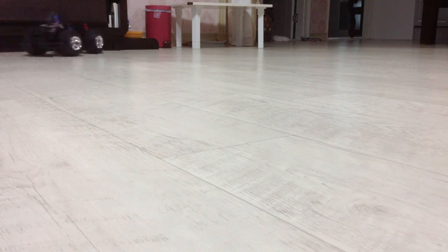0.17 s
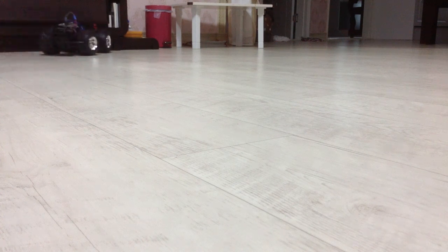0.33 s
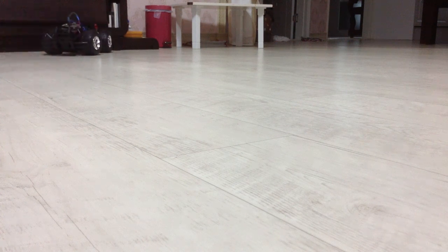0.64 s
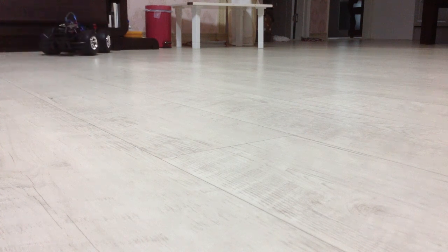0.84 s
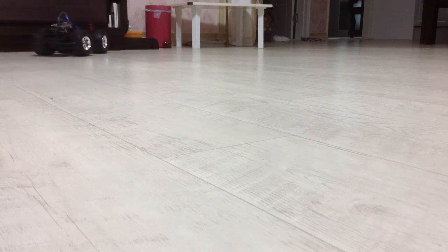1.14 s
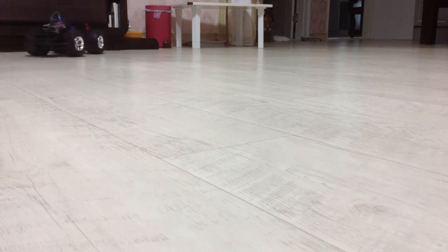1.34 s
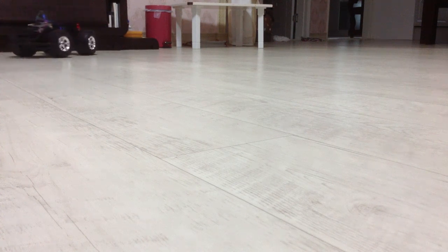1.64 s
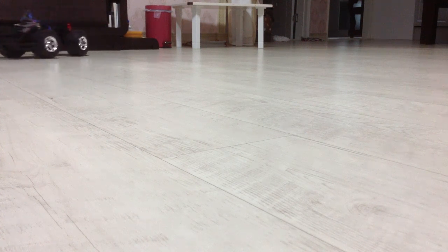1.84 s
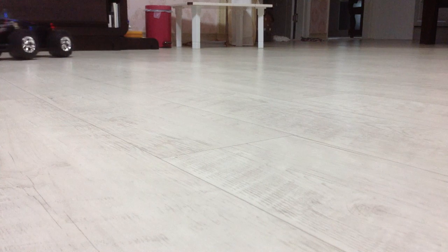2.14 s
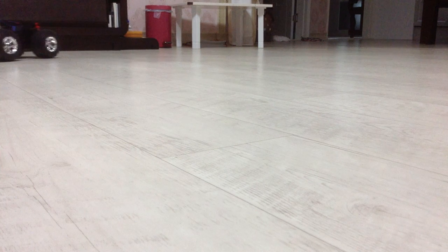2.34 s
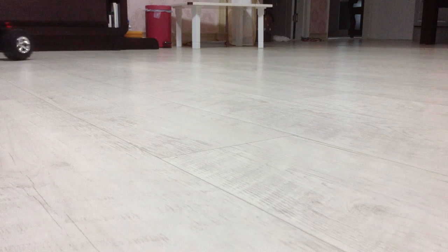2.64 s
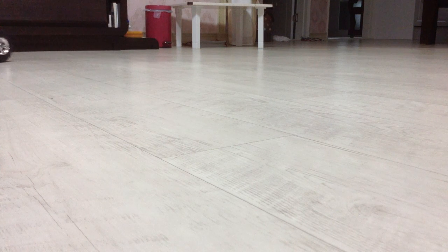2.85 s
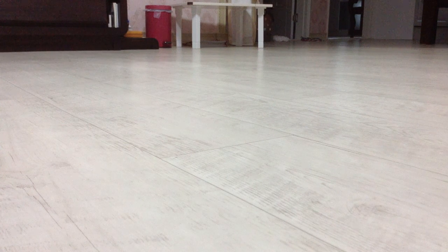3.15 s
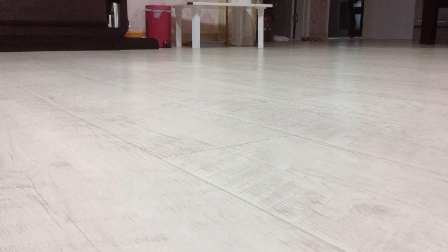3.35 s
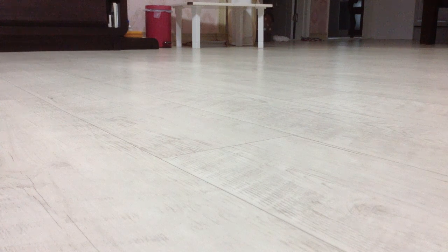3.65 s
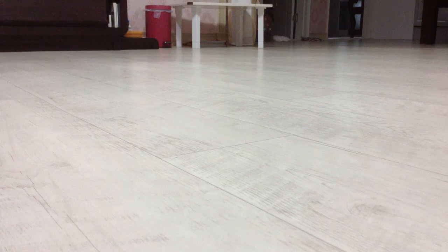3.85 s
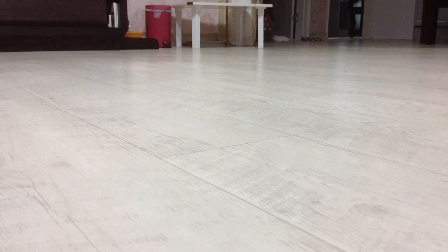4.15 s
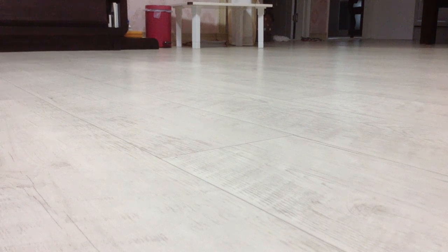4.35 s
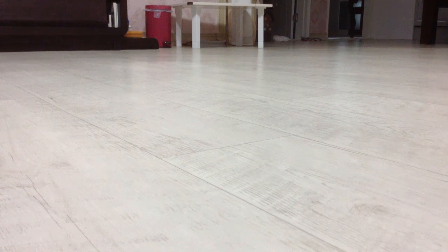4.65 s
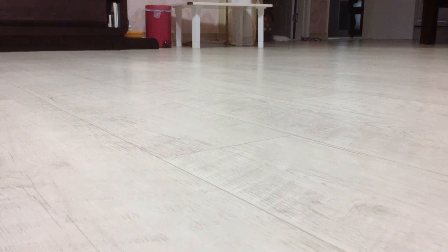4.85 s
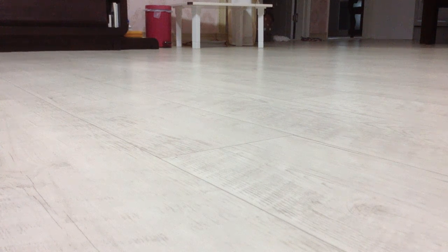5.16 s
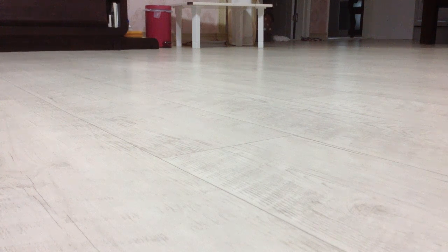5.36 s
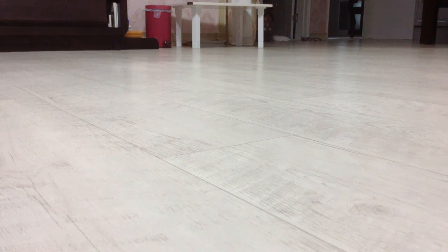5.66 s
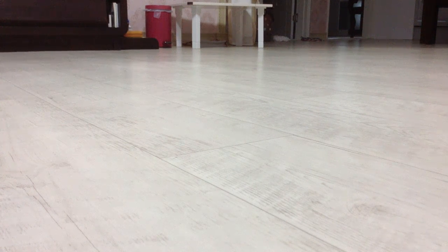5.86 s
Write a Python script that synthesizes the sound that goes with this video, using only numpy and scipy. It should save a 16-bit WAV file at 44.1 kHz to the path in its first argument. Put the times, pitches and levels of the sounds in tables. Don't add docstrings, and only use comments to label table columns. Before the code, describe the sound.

Already at speed, a toy car's rough plastic rattle and motor hiss fill a bare room, then a hard clattering crash rings out almost at once. A few small rebounds follow, then near quiet. The car starts again softly, jerking and bumping over floor joints, grows into a loud steady chatter, and stops with a bright lighter knock. A weak ticking restart begins to build. The microphone sits near the floor, over faint hum.

```python
import sys
import numpy as np
from scipy import signal
from scipy.fft import rfft, irfft
from scipy.io import wavfile
from scipy.ndimage import uniform_filter1d

SR = 44100
rng = np.random.default_rng(int(sys.argv[2]) if len(sys.argv) > 2 else 0)


def makeup_ratio(level_db):
    decades = np.asarray(level_db, float) / 20
    return 10 ** decades


def digitize_waveform(pressure):
    field = np.atleast_2d(pressure).T
    bounded = np.clip(field, -1, 1)
    quanta = np.round(bounded * 32767).astype(np.int16)
    wavfile.write(sys.argv[1], SR, quanta)


N = 265041

# [f/Hz, width/Hz, level/dB]
SHELL = [(1155, 130, 2.5), (1356, 95, 4.5), (1425, 370, 0)]
# [f/Hz, t60/s]
ROOM_T60 = [(150, 0.31), (500, 0.6), (1500, 0.6), (4000, 0.4), (7000, 0.56), (10500, 0.44), (14000, 0.47)]


def rms_one(x):
    return x / np.sqrt(np.mean(x ** 2) + 1e-20)


def at_hz(points, hz):
    points = np.array(points)
    return np.interp(np.log(hz), np.log(points[:, 0]), points[:, 1])


def in_time(rows, stop_s):
    s, *columns = np.transpose(rows)
    t = np.arange(N) / SR
    gate = np.interp(t, [s[0] - stop_s, s[0], s[-1], s[-1] + stop_s], [0, 1, 1, 0])
    return gate, [np.interp(t, s, c) for c in columns]


def drift(rate_hz):
    r = np.exp(-2 * np.pi * rate_hz / SR)
    noise = rng.standard_normal(N + SR)
    return rms_one(signal.lfilter([1], [1, -2 * r, r * r], noise)[SR:])


def band_pass(order, low_hz, high_hz):
    return signal.butter(order, [low_hz, high_hz], "band", fs=SR, output="sos")


def resonate(x, peaks):
    out = 0
    for k, (hz, width_hz, level_db) in enumerate(peaks):
        r = np.exp(-np.pi * width_hz / SR)
        b = (1 - r * r) / 2 * np.array([1, 0, -1])
        a = [1, -2 * r * np.cos(2 * np.pi * hz / SR), r * r]
        out = out + (-1) ** k * makeup_ratio(level_db) * signal.lfilter(b, a, x)
    return out


def ring(clicks, hz, t60_s):
    r, w = makeup_ratio(-60 / (t60_s * SR)), 2 * np.pi * hz / SR
    return signal.lfilter([0, np.sin(w)], [1, -2 * r * np.cos(w), r * r], clicks)


def tail(build_s):
    t, edges_hz, out = np.arange(SR // 2) / SR, 90 * 2 ** np.arange(0, 9.0), 0
    for low, high in zip(edges_hz, edges_hz[1:]):
        band = band_pass(2, low, min(high, 0.45 * SR))
        fade = makeup_ratio(-60 * t / at_hz(ROOM_T60, np.sqrt(low * high)))
        out = out + fade * signal.sosfilt(band, rng.standard_normal(len(t)))
    out = out * (1 - np.exp(-t / build_s))
    return out / np.sqrt(np.sum(out ** 2))


def room(x, wet_db, build_s, count):
    place, wet = np.arange(N) / N * (count - 1), 0
    for k in range(count):
        share = np.cos(np.pi / 2 * np.clip(place - k, -1, 1))
        wet = wet + signal.fftconvolve(x * share, tail(build_s))[:N]
    return x + makeup_ratio(wet_db) * wet


def scatter(x, wet_db, build_s):
    wet, white, edges_hz = 0, rng.standard_normal((2, N)), 340 * 2 ** np.arange(0, 6, 0.5)
    rise = np.exp(-1 / (build_s * SR))
    for k, (low, high) in enumerate(zip(edges_hz, edges_hz[1:])):
        band = band_pass(2, low, high)
        fall = makeup_ratio(-120 / (SR * at_hz(ROOM_T60, np.sqrt(low * high))))
        energy = signal.sosfilt(band, x + 1e-12 * white[0]) ** 2
        poles = np.convolve([1, -fall], [1, -rise])
        power = signal.lfilter([(1 - fall) * (1 - rise)], poles, energy)
        wet = wet + np.sqrt(np.abs(power)) * rms_one(signal.sosfilt(band, white[k % 2]))
    return x + makeup_ratio(wet_db) * wet


def contacts(per_s, spread_db, lumpy_db):
    heights = makeup_ratio(spread_db * np.minimum(rng.exponential(1, N), 4.0))
    sizes = heights * rng.choice([-1, 1], N)
    born = rng.random(N) < per_s * makeup_ratio(lumpy_db * drift(25.0)) / SR
    return rms_one(sizes * born / np.sqrt(per_s))


def household_hum():
    # [f/Hz, density/dB]
    spectrum = [(24, -64), (62, -53), (78, -18.5), (110, -23), (165, -4.5), (271, -3.5), (320, -8),
                (586, -11.5), (751, -11), (1010, -17), (1930, -24), (3000, -26), (3450, -23.5), (6060, -20),
                (9500, -28.5), (15200, -35)]
    hz = np.fft.rfftfreq(N, 1 / SR) + 1
    noise = irfft(rfft(rng.standard_normal(N)) * makeup_ratio(at_hz(spectrum, hz)), N)
    return makeup_ratio(-56.5 + 0.5 * drift(0.9)) * rms_one(noise)


def knocks():
    # [t/s, ring f/Hz, ring level/dB, rattle level/dB, brightness/dB]
    hard = [(.3078, 710, -28, -25.5, -11), (0.3121, 744, -23.5, -24, 1), (0.3134, 1940, -20, -20.5, 2.5),
            (0.3152, 1210, -21.5, -25.5, 5), (0.316, 3420, -18, -42, 4), (0.3194, 570, -24, -46, -18),
            (0.3235, 1505, -21, -36, -10), (0.327, 1377, -16.5, -30, -9), (0.3272, 774, -23.5, -47, -5),
            (0.338, 678, -27, -49, -5), (0.334, 3300, -39, -50, -14), (0.342, 2300, -21.5, -27, -23),
            (0.3804, 1224, -24, -51, -1), (0.33, 403, -34, -52, -10), (0.422, 570, -32.5, -50, -6)]
    rebounds = [(0.606, 1300, -43, -45, 0), (0.6107, 2050, -40, -44, -10), (0.612, 7100, -45, -48, -6),
                (0.6125, 2030, -36, -40, -10), (0.628, 1400, -41, -41, -10), (0.666, 1510, -43, -47, -4),
                (0.677, 790, -42, -47, -9), (.680, 806, -34, -35, -15), (0.683, 1310, -37, -35, -12),
                (0.692, 3580, -41, -44, -9), (0.701, 2050, -31, -49, 0.5), (0.707, 8350, -35, -49, 2),
                (0.708, 7100, -39, -50, 1), (0.7026, 1680, -31, -38, -7), (0.713, 2300, -36, -46, -5),
                (0.7093, 1490, -31.5, -39, -8), (.708, 664, -33.5, -37.5, -8), (0.712, 538, -37, -50, -10),
                (0.732, 2270, -34, -37, -11), (0.745, 610, -37.5, -50, -7), (0.77, 1245, -37, -53, -7),
                (0.814, 744, -42, -52, -9), (0.889, 2200, -46, -44, -6), (4.3455, 2300, -37, -50, 2),
                (4.348, 2280, -30, -48, 5), (4.3512, 1400, -40, -46, -12),
                (4.3515, 4460, -24.5, -38.5, 1.5), (4.3515, 1300, -31, -50, 7), (4.3525, 6100, -30, -54, 7),
                (4.387, 8600, -40, -58, 6), (4.361, 1280, -37, -50, 0), (4.368, 4400, -35, -58, 9),
                (4.412, 1050, -40, -52, 7)]
    ticks = [(1.031, 1500, -45, -56, -9), (1.032, 700, -48, -60, -9), (1.072, 800, -48, -60, -9),
             (4.6, 9000, -56, -66, 6), (1.4325, 1900, -47, -52, -3), (1.9244, 1580, -48, -52, -3),
             (4.605, 2400, -60, -63, 0), (4.832, 2600, -60, -61, -1), (5.103, 2500, -54, -57, -1),
             (5.1675, 2100, -54, -55, 2), (5.385, 2600, -52, -56, -2), (5.549, 2300, -53, -56, 1),
             (5.562, 1900, -53, -57, 0), (5.6766, 2600, -51, -54, -2)]
    # [f/Hz, level/dB, t60/s]
    floor_modes = [(176, -23.5, 0.26), (213, -13, 0.18), (328, -16, 0.069)]
    edges_hz = [480, 1750, 5000, 9500]
    # [f/Hz, width/Hz, level/dB]
    metal = [(7050, 800, -4), (5500, 1400, -11)]
    rattle_s, ring_t60_s, ring_wet = 0.014, 0.043, makeup_ratio(-11)
    tick_db, tick_follows = -6, 1.77

    rows, rings, rattles = np.array(hard + rebounds + ticks), np.zeros(N), np.zeros(N)
    at = np.round(rows[:, 0] * SR).astype(int)
    loose = rng.choice([-1, 1], (3, N)) * (rng.random((3, N)) < 0.3)
    clack_db, bright_db = rows[:, 3], rows[:, 4]
    levels_db = [clack_db, clack_db + bright_db, clack_db + tick_db + tick_follows * bright_db]
    for group, level_db in enumerate(levels_db):
        blows = np.full(N, 1e-18)
        blows[at] = makeup_ratio(level_db + 14)
        fading = signal.lfilter([1], [1, -np.exp(-1 / (rattle_s * SR))], blows)
        burst = (-1) ** group * 0.89 * blows + 0.18 * fading * loose[group]
        order = 1 if group == 2 else 2
        rattles += signal.sosfilt(band_pass(order, *edges_hz[group:group + 2]), burst)

    click = signal.unit_impulse(SR // 4)
    for i, (_, hz, ring_db, *_) in zip(at, rows):
        t60_s = ring_t60_s * (1000 / hz) ** 0.97
        rings[i:i + SR // 4] += makeup_ratio(ring_db) * ring(click, hz, t60_s)
    floor_blows = np.full(N, 1e-18)
    floor_blows[at] = makeup_ratio(2 * clack_db + 15.5)
    thud = sum(makeup_ratio(level_db) * ring(floor_blows, hz, t60_s) for hz, level_db, t60_s in floor_modes)

    near = rings * (1 - ring_wet)
    heard = near + room(ring_wet * rings + thud, wet_db=3.5, build_s=0.0003, count=3)
    crash = scatter(rattles, wet_db=4.0, build_s=0.0012)
    dull = signal.sosfilt(signal.butter(1, 14500.0, fs=SR, output="sos"), 1.075 * crash)
    heard = heard + dull + resonate(crash, metal)
    return signal.sosfilt(signal.butter(4, 140.0, "high", fs=SR, output="sos"), heard)


def bumps():
    # [t/s, peak/dB, ring f/Hz]
    thumps = [(1.031, -36, 1150), (1.065, -42, 1495), (1.073, -36, 1194), (1.2503, -34, 1200),
              (1.3922, -36, 1315), (1.4347, -35, 1290), (1.528, -41.5, 1570), (1.671, -33, 1480),
              (1.6844, -29, 1214), (1.717, -35, 1455), (1.73, -32, 1234), (1.761, -49, 1200),
              (1.798, -36, 1400), (1.847, -39, 1215), (1.895, -29, 1366), (1.921, -31, 1196),
              (1.947, -31, 1434), (1.9972, -33, 1400), (2.011, -42, 1150), (2.0561, -32, 2190),
              (2.07, -29, 1350), (2.0894, -47, 1350), (2.12, -36, 1300), (2.169, -50, 1340),
              (2.27, -47, 1450), (2.321, -38, 1470), (2.4048, -33, 1840), (2.47, -32, 1210),
              (2.476, -30, 1393), (2.546, -34, 1378), (2.65, -37, 1500), (2.79, -30.5, 1290),
              (2.971, -26.5, 1364), (4.605, -54, 1700), (4.832, -52, 1800), (5.055, -53, 1450),
              (5.1043, -50, 1700), (5.385, -44, 1100), (5.8, -44, 1350), (5.937, -46, 1300),
              (5.1675, -53, 1310), (5.5534, -56, 1300), (5.6767, -46, 1580)]
    rise_s, t60_s, ring_level_db = 0.003, 0.038, -8
    clicks, rings = np.full(N, 1e-18), np.zeros(N + SR)
    rise = 1.58 * (1 - np.exp(-np.arange(SR // 4) / SR / rise_s))
    click = signal.unit_impulse(SR // 4)
    for s, peak_db, hz in thumps:
        i = round(s * SR)
        clicks[i] = makeup_ratio(peak_db + 20.0)
        rings[i:i + SR // 4] += makeup_ratio(peak_db + ring_level_db) * rise * ring(click, hz, t60_s)
    struck = resonate(resonate(clicks, SHELL), [(1400, 280, 0)])
    panels = resonate(resonate(rings[:N], [(1350, 780, 1)]), [(1350, 1100, 0)])
    return struck + panels


def whine():
    # [t/s, f/Hz, level/dB]
    course = [(1.85, 1370, -60), (2.1, 1370, -61), (2.2, 1333, -60), (2.33, 1370, -56), (2.45, 1350, -51),
              (2.56, 1378, -53), (2.65, 1342, -54), (2.78, 1317, -53), (2.9, 1350, -49), (2.99, 1350, -57),
              (3.08, 1296, -54), (3.2, 1350, -51), (3.3, 1350, -52)]
    blur_per_s, trim_db = 12.0, -4
    gate, (hz, level_db) = in_time(course, stop_s=0.08)
    phase = 2 * np.pi * np.cumsum(hz) / SR
    steady, loose = 0.78 + 0.48 * drift(blur_per_s), 0.42 * drift(blur_per_s)
    return gate * makeup_ratio(level_db + trim_db) * (steady * np.sin(phase) + loose * np.cos(phase))


def gear_tones():
    # [peak t/s, f/Hz, peak/dB, length/s, glide/(Hz/s)]
    tones = [(0.13, 905, -41.5, 0.11, -55), (0.18, 945, -40.5, 0.07, 48), (0.085, 955, -50, .05, 48),
             (0.215, 865, -45, 0.0505, -40), (0.027, 620, -52, .1, 40), (0.03, 1345, -49, .04, 30),
             (0.031, 1610, -49, 0.06, -50), (0.005, 1400, -47, 0.044, -50), (0.245, 1440, -49, .07, 40),
             (0.15, 1540, -48.5, 0.19, 50), (0.25, 1460, -55, .1, 27), (0.27, 590, -48, 0.17, 16),
             (0.045, 2900, -53.5, 0.16, -50), (0.085, 2790, -53, 0.075, 50), (0.15, 3540, -57, 0.14, 50),
             (0.205, 2920, -47.5, 0.073, 47), (0.26, 2500, -54, 0.092, 52), (0.2, 6010, -62, .15, 50),
             (2.37, 655, -59, 0.36, 29), (2.755, 735, -48.5, 0.043, 19.5), (3.12, 990, -56.5, 0.24, 20),
             (3.17, 810, -68, .12, 200), (1.98, 1370, -62, 0.12, -100), (2.16, 1341, -61, 0.12, -100),
             (2.52, 745, -53, .08, 20), (2.62, 745, -48.5, 0.1396, 60), (2.48, 920, -48, .05, -40),
             (2.3, 1460, -52, .1, 60), (2.885, 755, -44.5, 0.09, 20), (2.88, 1350, -55, .12, 52.5),
             (3.049, 758, -45.5, 0.18, 22), (3.077, 1300, -58, .12, -200), (3.563, 658, -52, 0.095, 6),
             (3.566, 1025, -48.5, 0.16, 35), (3.6, 1190, -49, 0.18, -51), (4.5, 669, -53, 0.27, -28),
             (3.795, 916, -49, 0.22, 5), (4.164, 619, -44.5, .1, 101.5), (4.258, 998, -49, 0.161, 105),
             (4.28, 674, -53, 0.08, -48.5)]
    more_tones = [
        (1.73, 1190, -58, 0.12, -51),
        (1.74, 1420, -56, .07, -40),
        (1.92, 3600, -60, .12, 40),
        (1.9, 2750, -60, .05, 40),
        (1.7, 800, -58, .1, 30),
                  (3.301, 685, -52, .18, 18), (3.238, 1260, -49, .1, -100), (3.33, 1490, -55, .12, 23),
            (3.39, 1500, -55, .12, 17), (3.396, 1280, -54, .08, 20), (3.48, 1485, -55, 0.063, 20),
            (3.803, 620, -56, 0.12, 20), (3.79, 1200, -52, .06, 20), (3.3, 960, -48, 0.1096, 20),
            (3.9, 1175, -53, .15, -46), (3, 2600, -56, .06, 20), (4.04, 595, -49.5, 0.15, -55),
            (4.039, 740, -51, 0.0796, 20), (4.045, 1300, -57, 0.078, 20), (4.13, 907, -50, 0.16, 19),
            (4.198, 1270, -49, .12, -50), (4.226, 3600, -50, 0.073, 20), (3.74, 590, -53, .12, 20),
            (3.72, 980, -53, 0.086, 18), (5.74, 1060, -57.5, 0.15, -31.5), (5.83, 1370, -57, 0.1, 20),
            (5.73, 910, -60, .08, 20), (5.55, 630, -63, .1, 20), (5.19, 1100, -62, .06, 20)]
    fade_db = 14.5
    out = np.zeros(N)
    waver, flicker_db = 1 + 0.005 * drift(12.5), 3.5 * drift(19.0)
    for s, hz, peak_db, length_s, glide in tones + more_tones:
        start, stop = max(int((s - length_s) * SR), 0), min(int((s + length_s) * SR), N)
        span = slice(start, stop)
        since_s = np.arange(start, stop) / SR - s
        phase = 2 * np.pi * np.cumsum((hz + glide * since_s) * waver[span]) / SR
        throb = 1 + 0.3 * np.sin(phase / 22.0)
        swell_db = -fade_db * (2 * since_s / length_s) ** 2
        out[span] += makeup_ratio(peak_db + swell_db + flicker_db[span]) * throb * np.sin(phase)
    return out


def effort():
    # [t/s, motor effort/dB, shell towards the listener/dB, extra brush hiss/dB]
    runs = [
        [(0.0, -46, 2, 0.5), (0.1, -48, 0.5, -2), (0.18, -46, 2.5, -3.5), (0.25, -50, 0.5, -3),
         (0.305, -41.5, 4.5, -3)],
        [(0.92, -69, -0.5, -3), (1.3, -63.5, -0.5, -2), (1.65, -63.5, 2, 3), (1.88, -60, 0.5, 3),
         (2.06, -57, 0, 0.5), (2.3, -55, 3.5, 1), (2.53, -50, 0.5, 0), (2.7, -51.5, 0.5, 1.5),
         (2.85, -50, 1, -1), (3.06, -50, -0.5, 0.5), (3.22, -48.5, 0, 2), (3.5, -46.5, 0, -0.5),
         (3.8, -47, -1, 0.5), (4.1, -46, 0.5, -1), (4.342, -45.5, -1, -1)],
        [(4.98, -78, 3.5, 2), (5.14, -75, 2, 3), (5.19, -75, 0, 9), (5.25, -73.5, 2, 3), (5.43, -71, 0.5, 3),
         (5.48, -71.5, 1.5, 7), (5.62, -69.5, 3.5, 5), (5.76, -66.5, 3, -1), (5.83, -65, 3.5, 5),
         (6.01, -61.5, 2, -1)],
    ]
    # [t/s, extra effort/dB, decay/s]
    lurches = [(1.0, -12, .03), (1.03, 8, .02), (1.062, 3.5, 0.1), (1.245, 9, 0.039), (1.39, 9, 0.035),
               (1.428, 14.5, 0.024), (1.52, 6, 0.081), (1.665, 10.5, 0.037), (1.913, 12.5, 0.039),
               (2.24, 9, 0.035), (2.07, 5.5, 0.076), (2.19, -5, 0.035), (2.48, 0.5, 0.14),
               (3.17, 8.5, 0.028), (3.55, 2.5, 0.15), (3.78, 1, 0.058), (3.64, 2, .04), (3.9, 0.5, .04),
               (5.1, 16, .02), (5.155, 18, 0.015), (5.18, 14, 0.011), (5.28, 5, .02), (5.38, 7, 0.034),
               (5.54, 19, 0.036), (5.675, 8, 0.03), (5.795, 6, .06)]
    full_db, rise_s, brush_share = -47, 0.006, 0.86
    flutter_db, flutter_per_s, evens_out_s = 1.5, 24, 0.14
    gates, columns = zip(*[in_time(run, stop_s=0.0012) for run in runs])
    on = sum(gates)
    weighted = sum(g * np.array(c) for g, c in zip(gates, columns))
    effort_db, facing_db, hiss_db = weighted / np.maximum(on, 1e-9)
    load = drift(flutter_per_s)
    unrest_db = flutter_db * (load - uniform_filter1d(load, int(evens_out_s * SR)))
    for s, extra_db, fade_s in lurches:
        since_s = np.maximum(np.arange(N) / SR - s, 0)
        unrest_db = unrest_db + extra_db * (1 - np.exp(-since_s / rise_s)) * np.exp(-since_s / fade_s)
    return on, effort_db - full_db + unrest_db, facing_db, hiss_db - (1 - brush_share) * unrest_db


def running_gear():
    # [f/Hz, width/Hz, level/dB]
    tub_modes = [(570, 180, 0), (718, 170, 0), (979, 128, 5)]
    gearbox_modes = [(1785, 166, 1.5), (2300, 830, 1), (2750, 303, 6), (3607, 400, 1.5)]
    casing_modes = [(4114, 520, 1), (6140, 1280, -9.5)]
    brush_modes = [(6700, 2400, -8), (9200, 1450, -8), (11130, 1470, -3.5), (13370, 2940, -2.5),
                   (14800, 950, 1)]
    controller_modes = [(4500, 900, 0), (6360, 1800, 0)]
    # [t/s, low teeth/dB, controller hiss/dB]
    slack = [(0, -1.5, -79), (1.1, -6, -78), (1.3, -5, -80), (1.85, -0.5, -78), (1.95, 3, -79),
             (2.2, 2.5, -75), (2.3, -0.5, -75), (3.3, -1.5, -72), (4.3, -1.5, -72), (5.0, 8, -76),
             (5.15, 7, -69), (5.35, 5, -71), (5.55, 1, -66.5), (5.7, 2, -69), (6.01, 1, -68)]
    per_s = 370
    on, effort_db, facing_db, hiss_db = effort()
    tub_db = -46 + 0.58 * effort_db - 0.48 * facing_db
    shell_db = -45.5 + 0.79 * effort_db + facing_db
    gear_db = -46 + 1.024 * effort_db
    brush_db = -51.5 + 1.28 * effort_db

    tread = contacts(per_s, spread_db=0.0, lumpy_db=3.5)
    teeth = 0.62 * tread + contacts(4.4 * per_s, spread_db=-5.0, lumpy_db=4.5)
    sparks = 0.24 * tread + contacts(38.0 * per_s, spread_db=5.0, lumpy_db=4.0)

    def part(level_db, blows, modes, *body):
        sound = resonate(blows, modes)
        return makeup_ratio(level_db) * rms_one(resonate(sound, body) if body else sound)

    tub = part(tub_db - 4.5, tread + 0.44 * teeth, tub_modes, (689, 255, 0))
    shell = part(shell_db - 4.0, tread + 0.46 * teeth, SHELL, (1464, 810, 0))
    casing = part(gear_db - 7.5 - 1.2 * facing_db, teeth, casing_modes)
    gears = part(gear_db - 4.0, teeth, gearbox_modes, (3130, 10000, 0))
    _, (slack_db, controller_db) = in_time(slack, stop_s=0.01)
    low_teeth = part(gear_db - 16 + 1.9 * slack_db, teeth, [(2050, 460, 0)])
    gears = makeup_ratio(0.17 * slack_db) * gears + low_teeth
    controller = part(controller_db, sparks, controller_modes)
    brushes = part(brush_db + hiss_db - 4.0, sparks, brush_modes, (11800, 38000, 0))
    return on * (tub + shell + gears + casing + controller + brushes)


def scene():
    tones, wet = gear_tones() + whine(), makeup_ratio(-7)
    rolling = running_gear() + bumps() + wet * tones
    car = (1 - wet) * tones + room(rolling, wet_db=-0.5, build_s=0.041, count=17)
    sound = car + knocks() + household_hum()
    lead = int(0.25 * SR)
    earlier = makeup_ratio(-1.3) * signal.fftconvolve(rolling[lead:0:-1], tail(build_s=0.039))[lead:]
    return (sound + np.pad(earlier, (0, N - len(earlier))))[None]


def top_cut(x):
    return signal.sosfilt(signal.butter(12, 15710, fs=SR, output="sos"), x)


def record(dry):
    thin = signal.sosfilt(signal.butter(1, 30.0, "high", fs=SR, output="sos"), dry)
    cut = signal.sosfilt(signal.cheby2(24, 70, 15550, fs=SR, output="sos"), thin)
    return top_cut(cut)


dry = scene()
out = record(dry)
digitize_waveform(out)
```